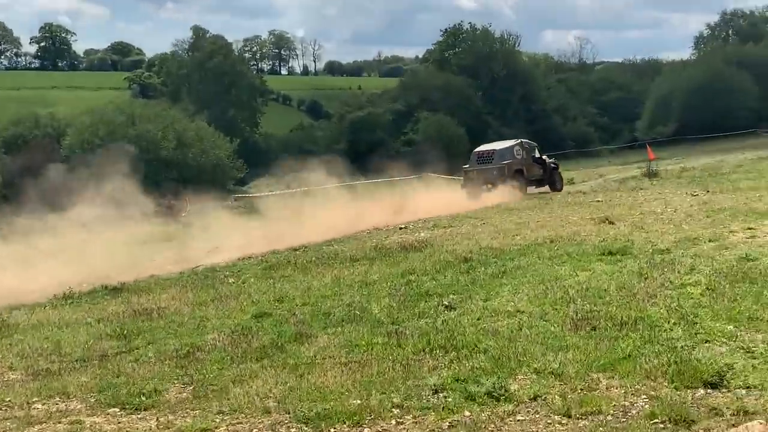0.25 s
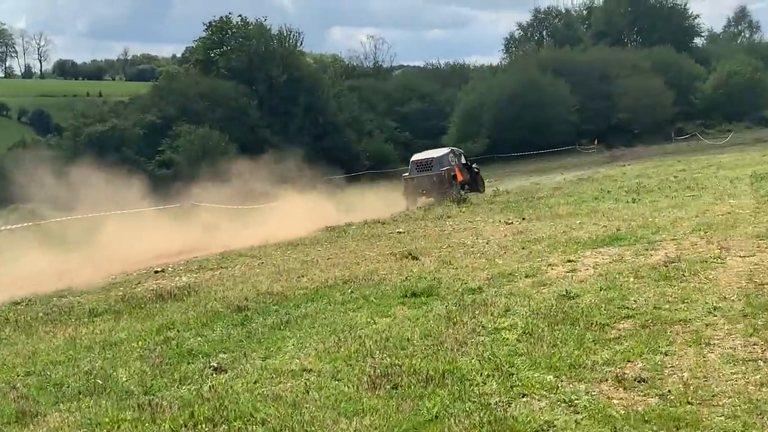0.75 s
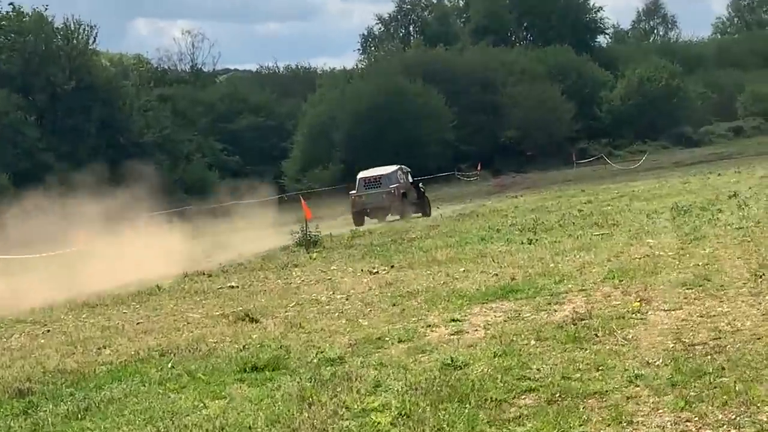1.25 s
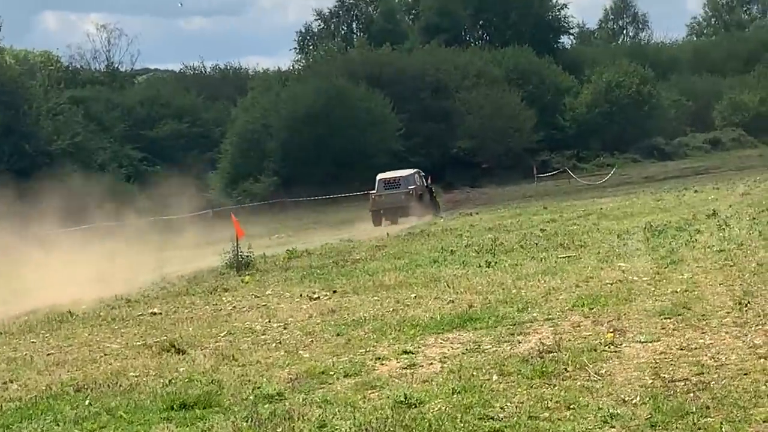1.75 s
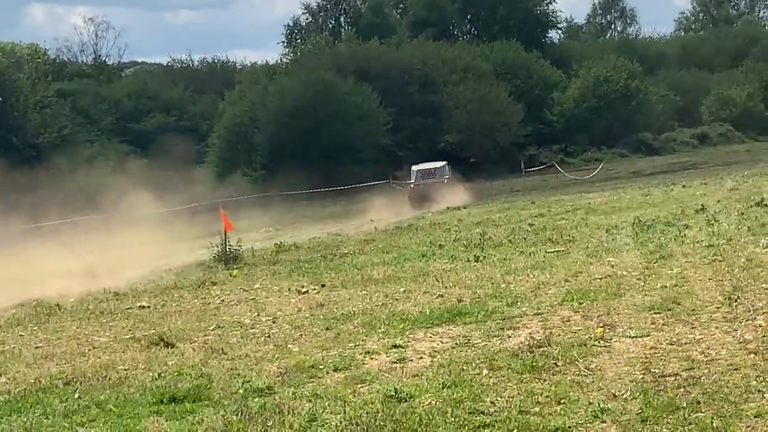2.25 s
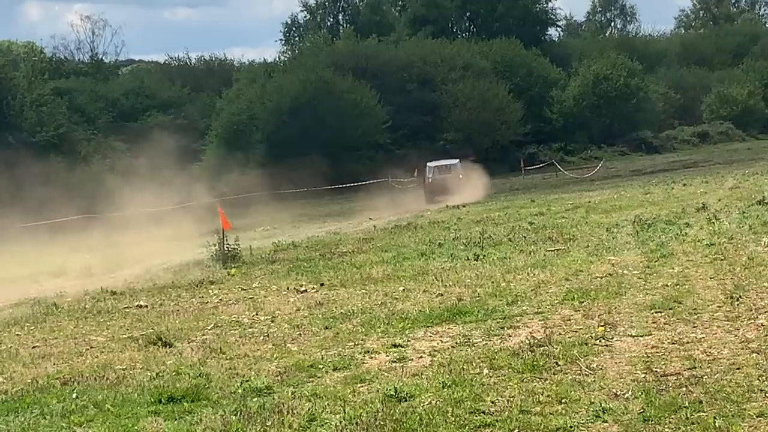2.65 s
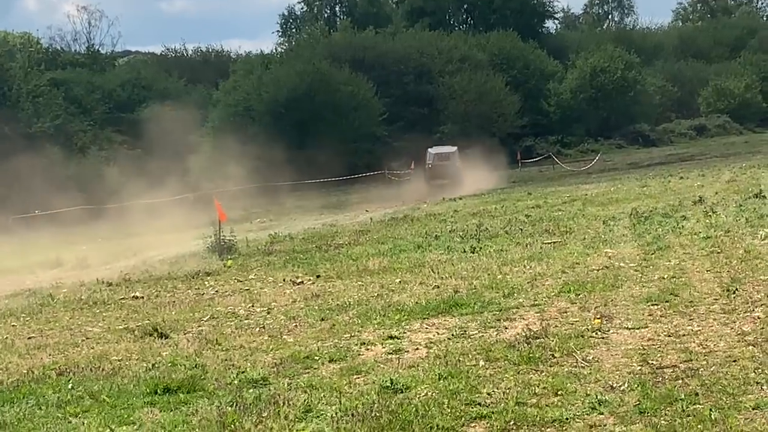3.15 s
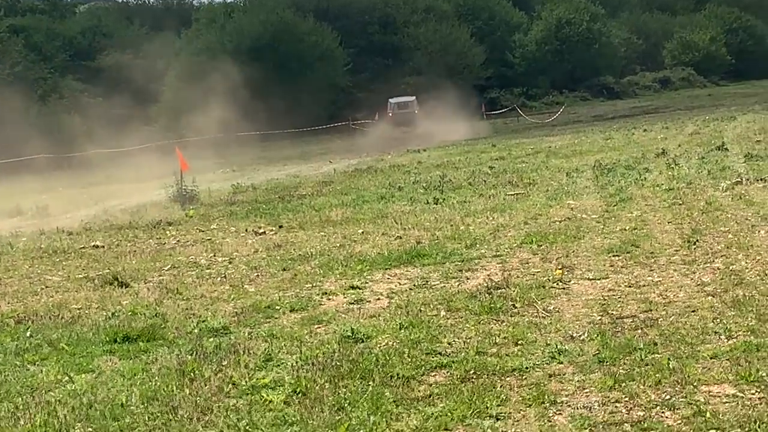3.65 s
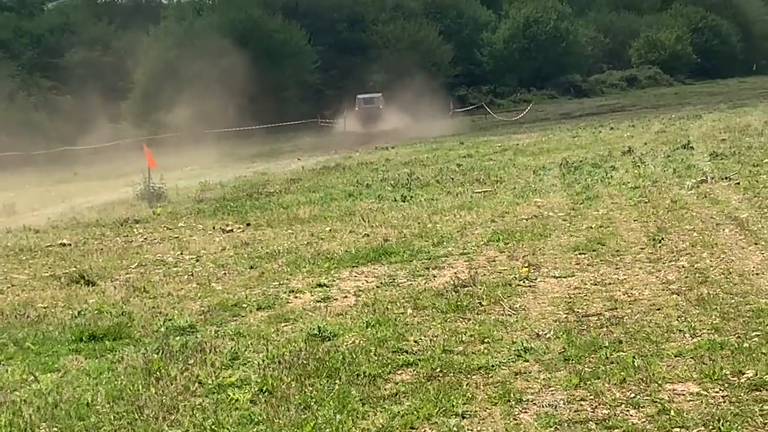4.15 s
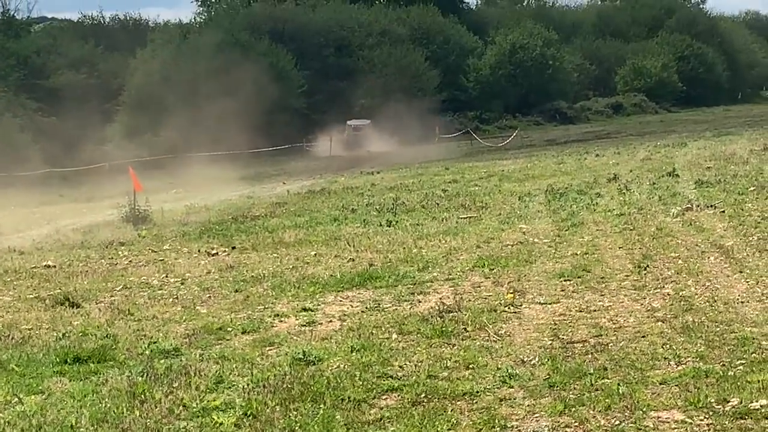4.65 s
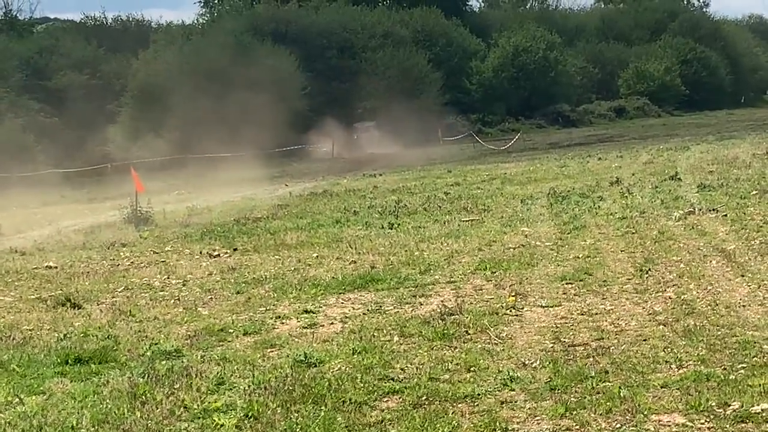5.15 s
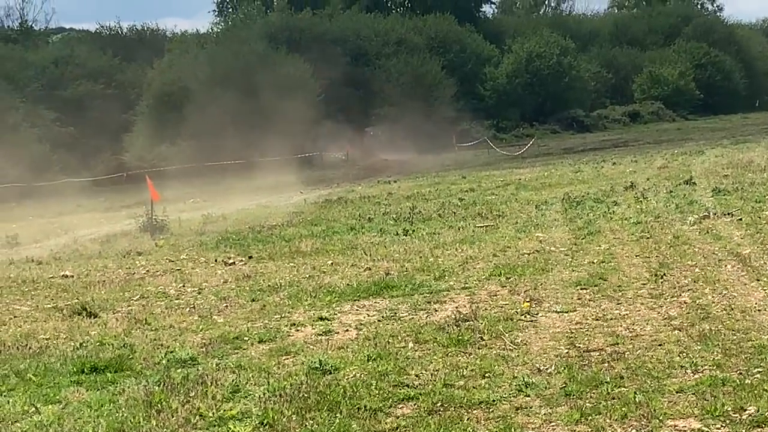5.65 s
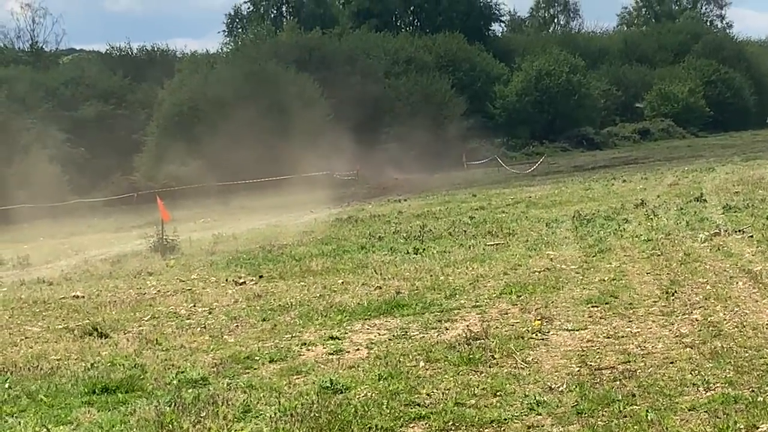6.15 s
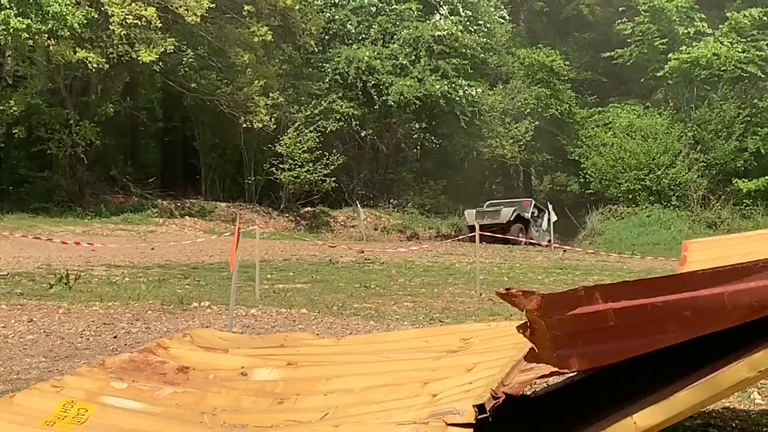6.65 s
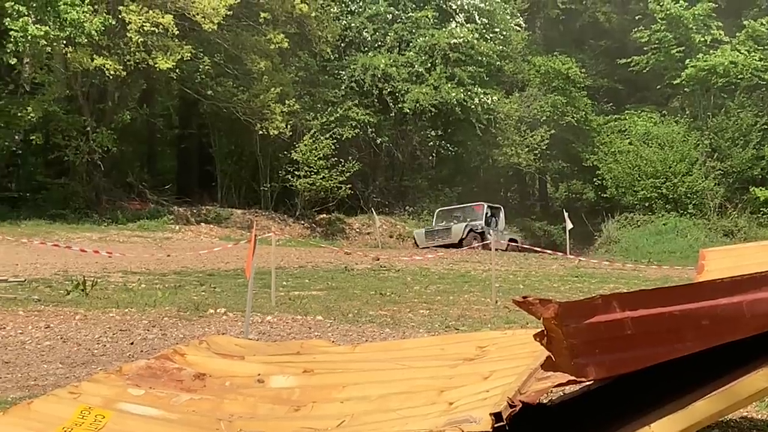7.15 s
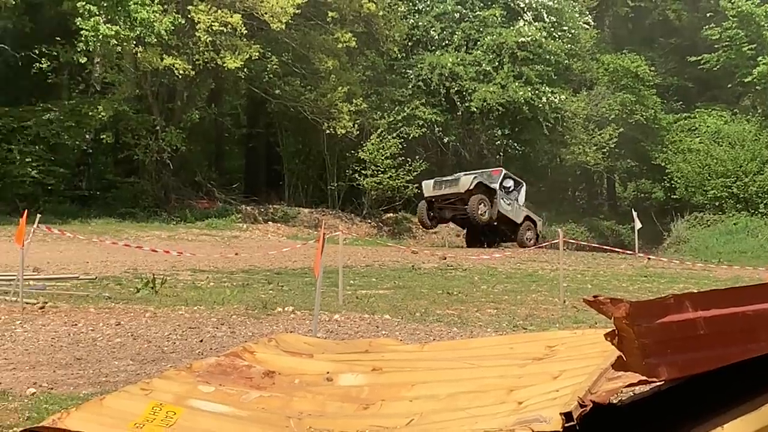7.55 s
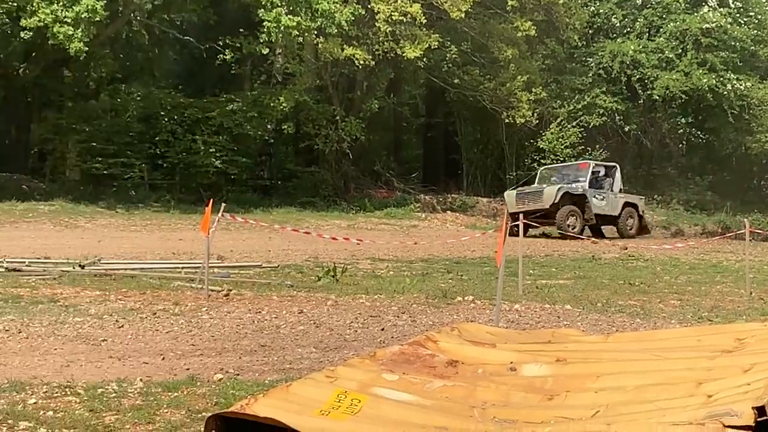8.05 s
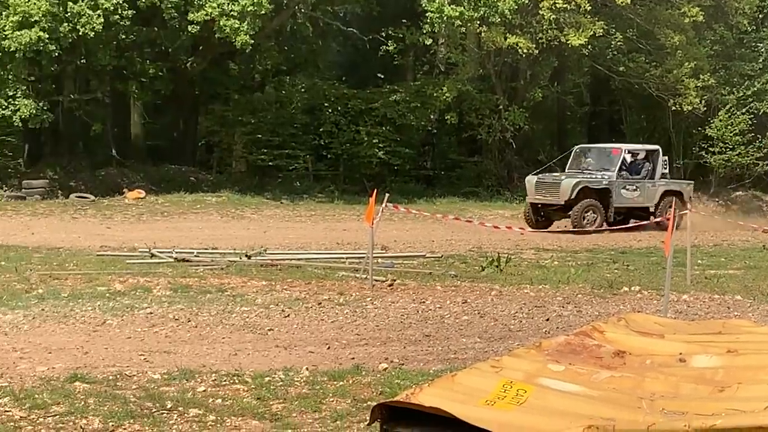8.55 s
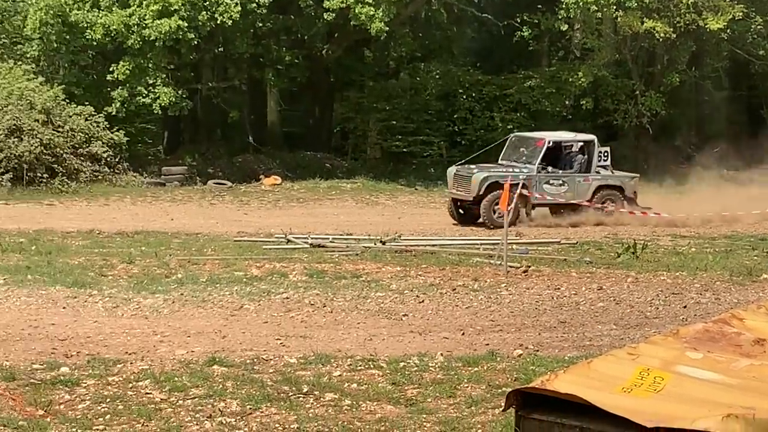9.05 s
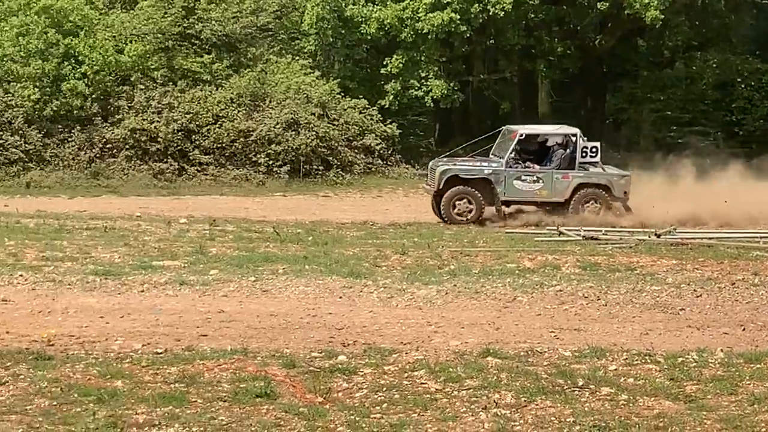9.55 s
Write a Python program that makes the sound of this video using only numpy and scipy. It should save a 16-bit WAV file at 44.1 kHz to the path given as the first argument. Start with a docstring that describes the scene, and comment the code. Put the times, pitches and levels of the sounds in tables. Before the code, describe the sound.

Outdoors on a dirt course, a throaty eight-cylinder off-road truck roars away, abruptly lifts off and recedes to a faint low note. A distant engine blips in the bass while dry grass snaps close to the stereo microphone and a bird whistles. Abruptly, by a wood, a second truck revs unevenly, changes gear and accelerates nearer with rasp, hiss and flying grit.

```python
"""A field, then the edge of a wood. In the field an eight-cylinder off-road truck roars, lifts off and recedes
while a far engine blips its throttle, dry grass snaps near the microphone and a bird whistles. By the wood
a second truck climbs a bank, changes gear and accelerates towards the microphone; an engine drones briefly behind.
Engines are stacks of harmonics shaped by pipe resonances, with pulsing noise for gas; hiss, grit, grass and
wash are coloured noise, the bird gliding sines. All source levels are ahead of the recorder's soft ceiling."""
import sys
import numpy as np
from scipy import signal
from scipy.fft import rfft, irfft, next_fast_len
from scipy.io import wavfile
from scipy.ndimage import uniform_filter1d, map_coordinates

SR = 44100
rng = np.random.default_rng(int(sys.argv[2]) if len(sys.argv) > 2 else 0)


def put_to_file(sound):
    """Save the sound as 16-bit audio at rate SR, in the file named by the first command-line argument."""
    columns = np.atleast_2d(sound).T  # one column per channel
    safe = np.clip(columns, -1, 1)
    whole_steps = np.round(safe * 32767)
    wavfile.write(sys.argv[1], SR, whole_steps.astype(np.int16))


N = 432621

# Airy hiss of an accelerating truck, also the colour of scrabbling tyres.
# Each row: frequency in Hz, relative level in dB per Hz.
HISS_COLOUR = [(1500, -18), (2200, 4.5), (3600, 6), (6500, -21.5)]


def gain_of(db):
    """Amplitude factor of a level in dB."""
    return 10 ** (np.asarray(db) / 20)


def evened(x):
    """Scales a signal to rms 1."""
    return x / np.sqrt(np.mean(x ** 2) + 1e-20)


def read(points, hz):
    """Reads a frequency curve, straight on a logarithmic pitch axis."""
    f, value = np.transpose(points)
    return np.interp(np.log(hz + 1), np.log(f + 1), value)


def controls(rows):
    """Time axis and one sample-rate curve for each column after the first."""
    s, *columns = np.transpose(rows)
    t = np.arange(s[0], s[-1], 1 / SR)
    return t, [np.interp(t, s, c) for c in columns]


def wander(t, per_s):
    """Irregular movement of rms 1: sixteen sines of chance phase, the fastest at per_s Hz."""
    f = np.geomspace(per_s / 20, per_s, 16)[:, None]
    coarse = t[::128]
    waves = np.sin(2 * np.pi * (f * coarse + rng.random(f.shape)))
    return np.interp(t, coarse, evened(waves.sum(0)))


def coloured(points, size):
    """Noise of rms 1 with the given spectrum."""
    spectrum = rfft(rng.standard_normal(2 * next_fast_len(size // 2 + 1)))
    hz = np.linspace(0, SR / 2, len(spectrum))
    return evened(irfft(spectrum * gain_of(read(points, hz)))[:size])


def add(mix, s, sound, lag, pan_db=0., fade=.01):
    """Lays a sound into both ports; the left hears it lag samples late and pan_db louder than the right."""
    index = np.arange(len(sound))
    edge = np.minimum(index, index[::-1]) / (fade * SR)
    sound = sound * np.minimum(edge + .01, 1)
    for side, late in enumerate((max(lag, 0), max(-lag, 0))):
        part = mix[side, round(s * SR + late):][:len(sound)]
        part += sound[:len(part)] * gain_of(pan_db * (.5 - side))


def exhaust(t, cycle_hz, orders_db, pipe, unsteady_db, smear, count):
    """Multiples of the engine cycle through a fixed pipe, each wavering on its way through the air; rms near 1."""
    turns, out, power = np.cumsum(cycle_hz) / SR + .26, 0, 0
    for k in range(2, count):
        pipe_db = np.interp(t, t[::128], read(pipe, k * cycle_hz[::128]))
        level = gain_of(orders_db[k % 8] + pipe_db)
        drift = smear * k / 8 * wander(t, 25)  # firing times scatter a little
        # orders line up twice a cycle in two uneven thumps; those above the ninth arrive together, just ahead
        low_k = min(k, 9)
        beat = .7 * (1 + (k > 9)) * (k % 2) + .04 * low_k * (2 * k - low_k)
        waver = gain_of(unsteady_db * wander(t, 12))
        out = out + level * waver * np.cos(2 * np.pi * k * turns + drift + beat)
        power = power + level ** 2 / 2
    return out / np.sqrt(power), turns


def puffs(turns, depth, uneven_db):
    """Envelope of gas noise: eight rounded, unequal puffs for each of the given turns."""
    firing = 8 * turns
    number = firing.astype(int)
    cylinder = rng.standard_normal(8)[number % 8]
    chance = rng.standard_normal(int(firing[-1]) + 1)[number]
    size = gain_of(uneven_db * (cylinder + chance))
    puff = 1 - depth + depth * np.exp(-(firing % 1) / .5)
    return evened(uniform_filter1d(size * puff, size=60))


def leaving(mix):
    """Exhaust facing the microphone; a faint stack of evener orders lies under it and is left after the lift-off."""
    # Revs of the receding truck. Each row: time in seconds, engine cycles a second.
    revs = [(0, 32.9), (.45, 32.8), (.7, 28.5), (1.6, 28.3), (1.8, 25.6), (2.45, 25), (3.05, 22.5),
            (3.3, 27), (3.6, 23.7), (4.1, 25.3), (4.45, 21)]
    # Relative level in dB of each multiple of the cycle, indexed by its remainder after division by eight.
    orders_db = [4.5, -6.5, -24, -7, -29, -8, 3.5, -6.5]
    # The same from far off, where the orders even out.
    far_orders_db = [-4.5, -16, 2, 4.5, 5, -11, 7.5, -7]
    # Pipe resonances. Each row: frequency in Hz, relative level in dB.
    pipe = [(30, -58), (130, -10), (200, -6), (265, -3.5), (350, -18.5), (430, -3.5), (720, -14),
            (810, -18), (1050, -16), (1400, -25), (4800, -45.5), (7500, -42.5), (15500, -55.5)]
    # What the distance leaves of them. Each row: frequency in Hz, relative level in dB.
    far_pipe = [(60, -21), (160, 4.5), (240, -6.5), (340, -17.5), (480, -25.5), (700, -33.5)]
    # Tyres scrabbling as it leaves. Each row: start in seconds, length in seconds, mean level in dB.
    scrabbles = [(0.164, 0.045, -47.5), (0.405, .09, -53)]
    lift_s, lift_db_per_s, far_db = 0.45, -110, -34.5

    t, (hz,) = controls(revs)
    # loudness control at full throttle, then the lift-off; each layer follows it in its own way
    drive_db = np.minimum(-15 + lift_db_per_s * (t - lift_s), -15)
    note, turns = exhaust(t, hz, orders_db, pipe, unsteady_db=0.5, smear=0.096, count=11)
    far, _ = exhaust(t, hz, far_orders_db, far_pipe, unsteady_db=2.5, smear=0.14, count=26)
    far_end = np.minimum((t[-1] - t) / .4, 1)
    upper_pipe = [(f, db - 40 * (f < 340)) for f, db in pipe]  # the pipe without its bass
    # the upper orders sound in the first second only
    upper, _ = exhaust(t[:SR], hz[:SR], np.zeros(8), upper_pipe, unsteady_db=2.5, smear=.13, count=54)
    # gas noise swells twice a cycle, with the thumps
    roar = coloured(upper_pipe, len(t)) * puffs(turns / 4, 0.64, uneven_db=1.5)
    roar *= .5 * gain_of(1.285 * np.maximum(drive_db, far_db) - 3.0)
    engine = gain_of(drive_db - 1.1) * note + gain_of(far_db) * far * far_end + roar
    add(mix, t[0], engine, 1, .6, fade=.0005)
    add(mix, t[0], gain_of(1.377 * drive_db[:SR] - 5.5) * -upper, 1, -.5, fade=.0005)
    for s, length, db in scrabbles:
        size = round(length * SR)
        scrape = gain_of(db + 2.6 * wander(t[:size], 213))
        add(mix, s, scrape * coloured(HISS_COLOUR, size), 1)


def coming(mix):
    """A clean firing note over uneven orders, pulsing roar and rasp, intake hiss and the grit off the tyres."""
    # Revs before and after the gear change, a list for each. Each row: time in seconds, firings a second.
    gears = [
        [(6.535, 160), (6.78, 179), (6.98, 164), (7.1, 176), (7.24, 194), (7.32, 165)],
        [(7.32, 158), (7.55, 167), (7.76, 154), (7.9, 185), (8.05, 216), (8.13, 228), (8.3, 195), (8.42, 179),
         (8.62, 186), (8.75, 204), (8.95, 185), (9.1, 227), (9.33, 248), (9.48, 263), (9.65, 262), (9.81, 260)],
    ]
    # Relative level in dB of each multiple of the cycle, indexed by its remainder after division by eight;
    # two banks firing unevenly favour the 3rd and 5th.
    orders_db = [-23.5, -3.5, -13.5, -1, -3.5, -1, -10, -16]
    # Pipe resonances. Each row: frequency in Hz, relative level in dB.
    pipe = [(20, -38), (70, -1), (250, -0.5), (450, -4.5), (690, 1.5), (810, -11.5), (1250, -10),
            (2500, -29), (6000, -56)]
    # Second and third multiple of the firing note: level in dB against the bark, before the pipe.
    overtones_db = [-3, -9.5]
    # Upper layers. Each row: time in seconds, engine rasp in dB (before its mixing gains),
    # dirt and gravel off the tyres in dB.
    upper_layers = [(6.539, -52.5, -59.5), (7.26, -50.5, -58), (7.32, -49, -46.5), (7.7, -49, -49.5),
                    (8.08, -33.5, -39), (8.21, -35.5, -50), (8.42, -40.5, -51), (8.87, -32.5, -44),
                    (8.96, -33.5, -44), (9.07, -29.5, -40.5), (9.49, -26.5, -33.5), (9.81, -27.5, -36)]
    # Colour of the rasp, then of the grit. Each row: frequency in Hz, relative level in dB per Hz.
    rasp_colour = [(700, -17), (1000, 1.5), (1250, 2), (1400, -4), (1650, -1), (2200, -6), (2800, -26)]
    grit_colour = [(3000, -8.5), (5000, 8.5), (8000, 5.5), (11500, -23), (15500, -23)]
    # As the truck turns across the view its hiss reaches the left port later.
    # Each row: time in seconds, delay in samples.
    crossing = [(7.7, 4), (8.4, 5.5)]
    # the note sinks before the shift and returns as the clutch bites
    eases_s, shift_s, bites_s, shift_db = 7.02, 7.31, 7.42, -9.5

    for rows in gears:
        t, (hz,) = controls(rows)
        hz = uniform_filter1d(hz, size=2600, mode="nearest")  # the flywheel rounds the changes
        # levels grow with nearness, in dB per s; revs tip the balance from note to bark, in dB per Hz
        near_s, above_cruise_hz = t - 6.72, hz - 170
        note_db = -20.5 + 2.96 * near_s - 0.0045 * above_cruise_hz
        bark_db = -34 + 4.5 * near_s + 0.031 * above_cruise_hz
        easing_db = np.interp(t, [eases_s, shift_s, bites_s], [0, shift_db, 0])
        note_db = note_db + easing_db
        bark_db = bark_db - 0.046 * easing_db * (t < shift_s)  # the pipe burbles as the note sinks

        orders, turns = exhaust(t, hz / 8, orders_db, pipe, unsteady_db=1.8, smear=.1, count=31)
        firing = 16 * np.pi * turns + 0.2 * wander(t, 30)  # phase in radians, eight firings a cycle
        note = np.cos(firing)
        for k, db in enumerate(overtones_db, 2):
            note += gain_of(bark_db - note_db + db + read(pipe, k * hz)) * np.cos(k * firing)
        note *= np.sqrt(2) * gain_of(note_db + .9 * wander(t, 30))
        roar = coloured(pipe, len(t)) * puffs(turns, .7, uneven_db=1.5)
        engine = note + gain_of(bark_db) * orders + gain_of(bark_db - 6) * roar

        s, rasp_db, grit_db = np.transpose(upper_layers)
        rasp = gain_of(np.interp(t, s, rasp_db) + wander(t, 11)) * puffs(turns, 0.63, uneven_db=0.9)
        engine += gain_of(1.5) * rasp * coloured(rasp_colour, len(t))
        add(mix, t[0], engine, 4, .2, fade=.002)

        hiss = gain_of(-5.5) * rasp  # the hiss pulses with the rasp
        grit = gain_of(np.interp(t, s, grit_db) + wander(t, 25))
        direct, left, right = (
            hiss * coloured(HISS_COLOUR, len(t)) + grit * coloured(grit_colour, len(t)) for path in range(3))
        delay = np.interp(t, *np.transpose(crossing))
        late = map_coordinates(direct, [np.arange(len(t)) - delay], order=5)
        # the trees scatter part of hiss and grit, unlike at each port
        mix[:, round(t[0] * SR):][:, :len(t)] += [late + left / 3, direct + right / 3]


def blipping(mix):
    """A low note whose overtones open with the throttle; distance has removed all above the bass."""
    # Revs of the far engine. Each row: time in seconds, firings a second.
    revs = [(0, 133), (.5, 118), (.68, 85), (1.04, 72), (1.2, 53), (1.55, 66), (1.7, 51), (1.95, 62),
            (2.46, 78), (2.68, 82), (3.3, 68), (3.75, 44.5), (4.1, 90), (4.33, 52), (4.6, 75), (4.85, 60),
            (5.13, 92.4), (5.28, 70), (5.9, 69.5), (6.15, 84), (6.53, 60)]
    # Spells on the throttle. Each row: start in seconds, end in seconds, mean note level in dB.
    throttle = [(0.036, 0.56, -29.5), (0.702, 1.104, -35), (2.47, 2.885, -28.5), (3.796, 4.287, -32),
                (4.446, 5.166, -29), (5.22, 6.173, -34)]
    coasting_db, throttle_lag_s = -39.5, 0.21

    t, (hz,) = controls(revs)
    note_db = coasting_db
    for start, end, db in throttle:
        opening = np.clip(np.minimum(t - start, end - t) / throttle_lag_s + .5, 0, 1)
        note_db = note_db + (db - coasting_db) * opening
    # overtones grow faster than the note, and weaken at revs above 88 firings a second
    over_db = 1.562 * note_db + 17.0 - 0.071 * np.maximum(hz - 88, 0)
    turn = 2 * np.pi * np.cumsum(hz * (1 + 0.01 * wander(t, 20))) / SR
    note = gain_of(note_db + 1.4 * wander(t, 15)) * np.cos(turn)
    for k in range(2, 6):
        fall_db = .11 * hz * (k - 2) + .14 * np.maximum(k * hz - 240, 0)
        note += gain_of(over_db - fall_db + 2 * wander(t, 13)) * np.cos(k * turn + k)
    add(mix, t[0], np.sqrt(2) * note, -5, 1.2)


def drone(mix):
    """Engine behind the wood: a single sine at the firing rate, slightly rough in level."""
    # Each row: time in seconds, firings a second, mean level in dB.
    t, (hz, level_db) = controls([(6.56, 98, -28.5), (6.97, 129, -27), (7.07, 106, -23.5), (7.22, 148, -30),
                                  (7.48, 87, -29)])
    turn = 2 * np.pi * np.cumsum(hz) / SR
    level = np.sqrt(2) * gain_of(level_db + 2 * wander(t, 22))
    add(mix, t[0], level * np.cos(turn), 2, fade=0.022)


def snap(t60):
    """A stem breaks: a sharp noise burst, dying by 60 dB in t60 seconds, under a chance upper limit; peak 1."""
    t = np.arange(600) / SR
    top_hz = rng.uniform(5000, 15400) * 0.91
    burst = rng.standard_normal(600) * gain_of(-60 * t / t60)
    band = signal.butter(2, [1800, top_hz], "bandpass", fs=SR, output="sos")
    sound = signal.sosfilt(band, burst)
    return sound / abs(sound).max()


def grass(mix):
    """Single snaps from all sides, and fluttering noise rustles unlike at each port."""
    # Snaps. Each row: start in seconds, peak in dB before a 3 dB lift.
    snaps = [(0.633, -42), (1.1964, -34.5), (2.282, -34.5), (3.3328, -39.5), (3.6032, -40), (3.835, -36.5),
             (4.4019, -36), (4.4836, -36), (4.8663, -36), (4.928, -29.5), (5.0557, -34.5), (5.0813, -35),
             (5.115, -34.5), (5.219, -33.5), (5.2914, -34), (5.3358, -40), (5.5199, -37), (5.784, -26),
             (5.9909, -31), (6.0317, -34), (6.099, -42), (6.2531, -31.5), (6.2659, -32.5), (6.3078, -38),
             (6.4617, -41.5), (6.5266, -38)]
    # Spells of rustling, the first a faint bed under the rest.
    # Each row: start in seconds, length in seconds, mean level in dB.
    rustles = [(3.301, 3.1, -69), (3.326, 0.18, -57.5), (3.657, 0.31, -54), (4.331, 0.18, -54.5),
               (4.619, 0.079, -50), (4.82, 0.18, -54.5), (5.03, 0.31, -60)]
    # Each row: frequency in Hz, relative level in dB per Hz.
    rustle_colour = [(1500, 0.5), (5000, -0.5), (10000, -6.5), (15500, -7)]

    for s, db in snaps:
        add(mix, s, gain_of(db + 3.0) * snap(0.012), rng.integers(-18, 18), rng.normal(-1, 4.9), fade=.0001)
    for s, length, db in rustles:
        size = round(length * SR)
        flutter = gain_of(db + 5 * wander(np.arange(size) / SR, 150)) * signal.windows.tukey(size, .4)
        mix[:, round(s * SR):][:, :size] += flutter * [coloured(rustle_colour, size) for side in range(2)]


def bird(mix):
    """Falling whistles, near sines, flattening and swelling slightly towards the end."""
    # Each row: start in seconds, length in seconds, start pitch in Hz, end pitch in Hz, end level in dB.
    whistles = [(5.305, .055, 4300, 3050, -53), (5.485, .065, 3900, 2600, -55),
                (5.875, .15, 6800, 3450, -55), (6.18, .075, 7200, 6400, -61), (6.3, .07, 8000, 7400, -61),
                (6.43, .07, 7200, 5700, -59)]
    for s, length, start_hz, end_hz, db in whistles:
        left = 1 - np.arange(round(length * SR)) / (length * SR)  # share of the note still to come
        hz = end_hz + (start_hz - end_hz) * left ** 2.2 + 60 * wander(left * length, 300)
        whistle = np.sin(2 * np.pi * np.cumsum(hz) / SR)
        add(mix, s, np.sqrt(2) * gain_of(db - 3.94 * left) * whistle, 4, 1.5, fade=0.0079)


def field(mix):
    """Distant tyre and engine wash from the left, a part unlike at each port, and the hiss of dry grass."""
    # Colour of the wash. Each row: frequency in Hz, relative level in dB per Hz.
    wash_colour = [(20, -34.5), (60, -3.5), (225, -8), (340, -29), (780, -32), (1050, -26.5), (1400, -48),
                   (9000, -110)]
    # Hiss of the field. Each row: time in seconds, mean level in dB before the gain of each port.
    breeze = [(0, -53.5), (1.2, -60.5), (1.9, -65.5), (2.4, -60), (2.55, -53), (3.1, -56), (4.9, -54),
              (6.53, -58)]
    # Each row: frequency in Hz, relative level in dB per Hz.
    breeze_colour = [(800, 8.5), (1500, 9.5), (4000, -0.5), (8500, -16.5), (12000, -71)]

    swell = gain_of(-34.5 + 2.8 * wander(np.arange(N) / SR, 5.8))
    add(mix, 0, swell * coloured(wash_colour, N), -13, 1.1)
    mix += gain_of(-7.5) * swell * np.array([coloured(wash_colour, N) for side in range(2)])
    t, (hiss_db,) = controls(breeze)
    hiss = gain_of(hiss_db + 1.2 * wander(t, 12))
    port_gain = gain_of([[4.5], [2.5]])  # left, right
    mix[:, :len(t)] += hiss * port_gain * [coloured(breeze_colour, len(t)) for side in range(2)]


def scene():
    """Sums all sources into two ports, left and right."""
    mix = np.zeros((2, N))
    for add_source in (leaving, coming, blipping, drone, grass, bird, field):
        add_source(mix)
    return mix


def record(dry):
    """Soft ceiling of the recorder, then its band limit."""
    held = 1.22 * np.tanh(dry / 1.016)
    band_limit = signal.firwin(511, 16150, window=("kaiser", 9), fs=SR)  # low-pass, edge in Hz
    return signal.oaconvolve(held, band_limit[None], "same")


dry = scene()
out = record(dry)
put_to_file(out)
```